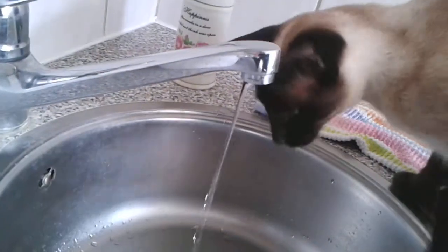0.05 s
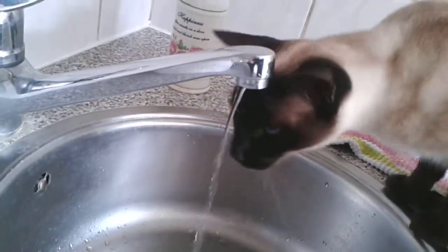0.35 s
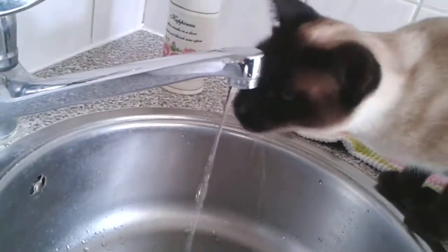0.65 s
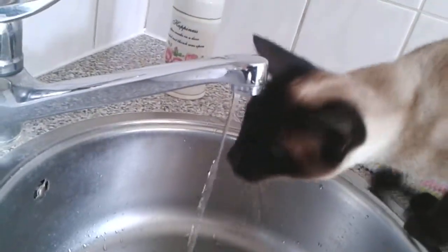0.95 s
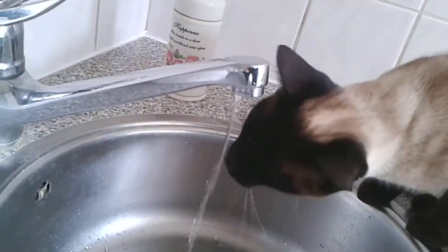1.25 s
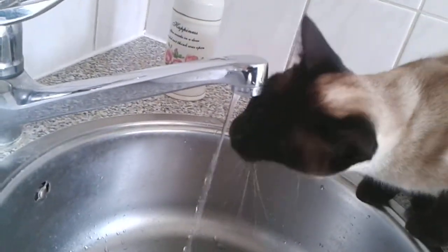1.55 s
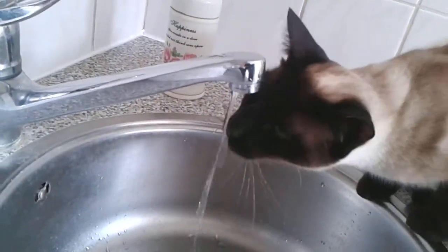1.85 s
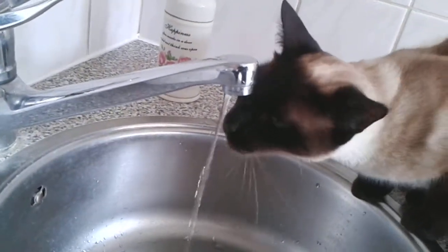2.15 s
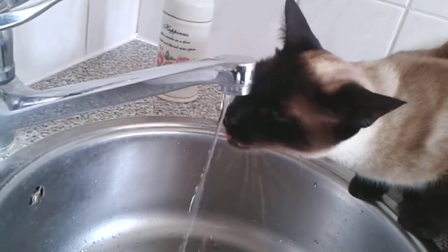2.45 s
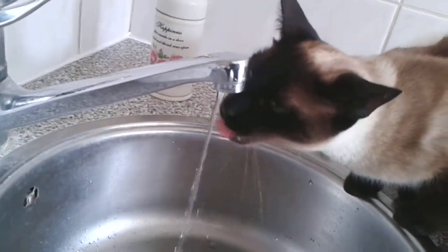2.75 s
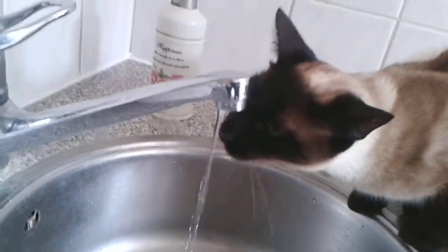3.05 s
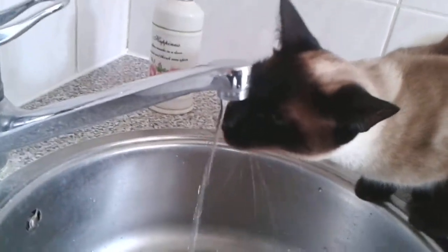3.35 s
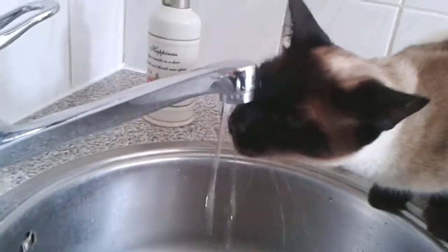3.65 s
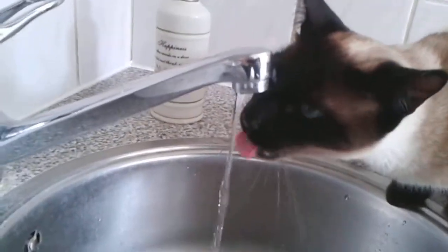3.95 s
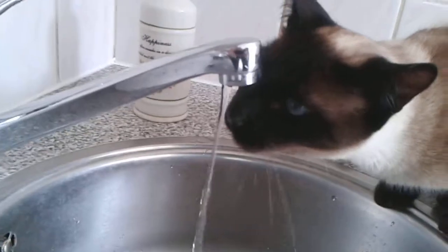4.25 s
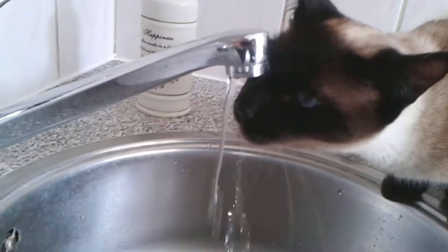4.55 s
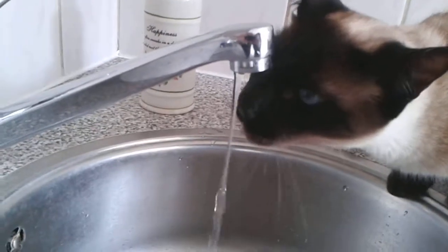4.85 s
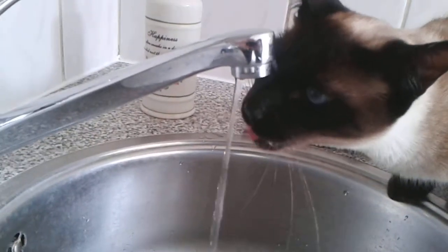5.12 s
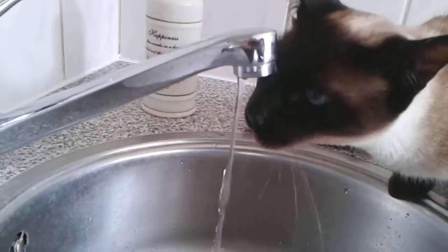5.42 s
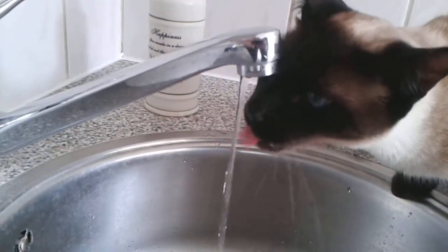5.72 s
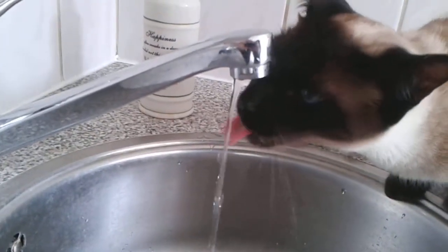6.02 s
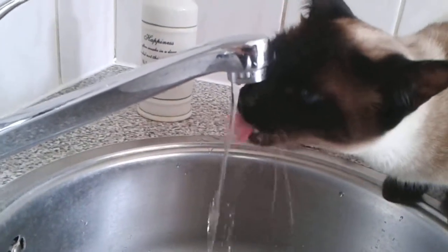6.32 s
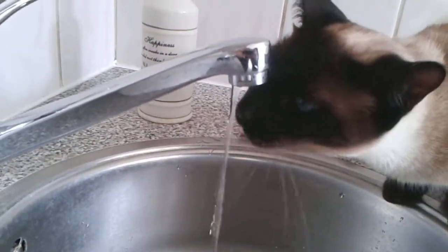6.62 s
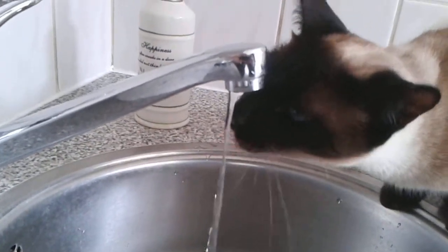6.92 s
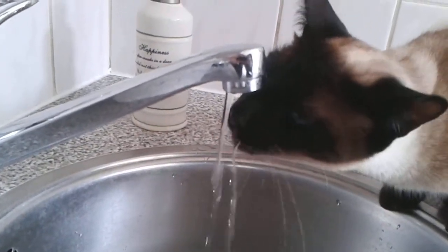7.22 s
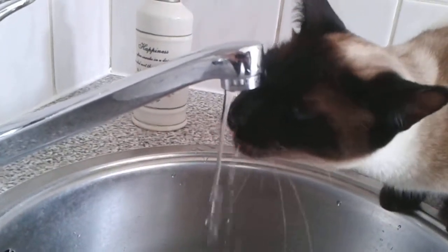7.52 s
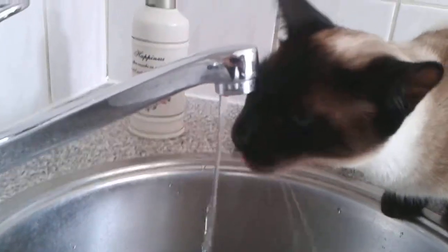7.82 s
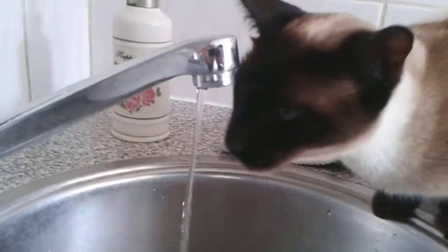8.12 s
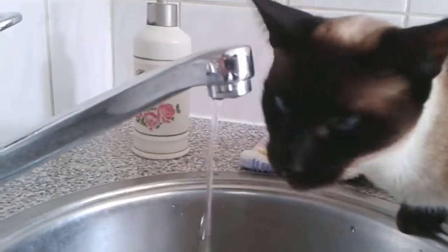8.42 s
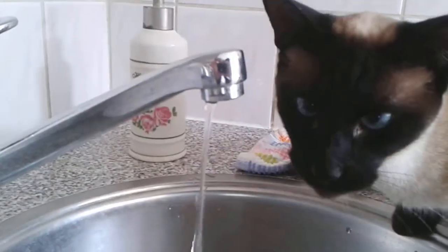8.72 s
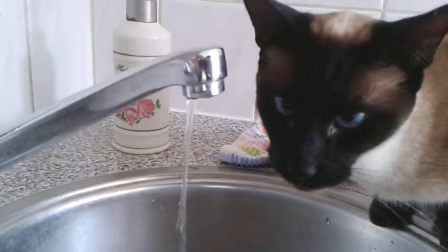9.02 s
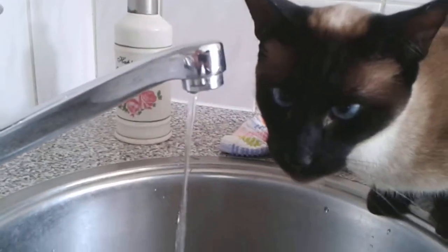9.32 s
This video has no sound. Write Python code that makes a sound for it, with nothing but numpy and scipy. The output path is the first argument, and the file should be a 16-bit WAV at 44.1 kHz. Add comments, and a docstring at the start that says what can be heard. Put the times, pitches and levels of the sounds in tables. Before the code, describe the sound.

A thin stream of tap water falls into a steel sink for the whole nine seconds or so, quiet and close. It fizzes and patters, with tiny high bubble pops, sharp drips on wet metal and a light, low drumming from the basin. The trickle starts gently and dips briefly around 1.5 and 2.5 seconds. From about 3 to 7.5 seconds a cat laps at it, about four soft, hollow clicks a second, each flicking a little water aside. The splatter grows busier, with brighter pops near 3.3, 4.8 and 5.3 seconds. The stream falters for an instant near 3.7 and 7.5 seconds, and the basin gives a faint low note as water lands again. After the lapping stops, the water keeps splashing, with lively drips and pops from 8 seconds to the end. The room is small and tiled, with a faint low rumble and hum underneath.

```python
"""Cat lapping at a kitchen tap

A thin stream falls into a steel sink while a cat laps at it for a spell, about four licks a second.
One flow curve sets how hard the water fizzes, patters and drums; all three sink when the stream breaks.
Bubbles pop and throw fine spray, loose drops tick on wet metal, and each lick flicks water aside.
The splashes rattle round the bowl and fade in a small tiled room, over the low rumble of the house."""
import sys
import numpy as np
from scipy import signal
from scipy.fft import rfft, irfft, next_fast_len
from scipy.io import wavfile
from scipy.ndimage import uniform_filter1d

SR = 44100
rng = np.random.default_rng(int(sys.argv[2]) if len(sys.argv) > 2 else 0)


def bounce(signal):
    """Save signal as a 16-bit WAV file at the path given by the first command-line argument."""
    frames = np.transpose(np.atleast_2d(signal))
    limited = np.clip(frames, -1, 1)
    pcm = np.round(limited * 32767).astype(np.int16)
    wavfile.write(sys.argv[1], SR, pcm)


N = 413216
TIME = np.arange(N) / SR
PATTER_DB = -66.5  # the patter at a flow of 0 dB; stray splashes are set against it

# the larger bubbles that pop where the water lands: t/s, level/dB, f/Hz
POPS = [(0.226, -58, 5550), (0.275, -61, 4600), (0.526, -56, 5470), (0.5944, -42.5, 5840),
        (1.286, -46.5, 4550), (1.324, -54, 4400), (1.353, -57, 4300), (1.4, -59.5, 4400),
        (1.671, -58.5, 4700), (1.711, -46.5, 6530), (1.715, -59, 3370), (1.7583, -44.5, 5600),
        (1.765, -63, 3000), (2.5687, -44.5, 5560), (2.6017, -45, 5570), (2.853, -65, 6600),
        (2.86, -57, 5210), (3.0653, -50.5, 5120), (3.347, -30.5, 5500), (3.4303, -40.5, 6500),
        (3.4485, -48, 6350), (3.484, -52.5, 3170), (3.516, -41, 5220), (3.5157, -53, 2120),
        (3.5437, -42, 5200), (3.819, -44.5, 5600), (3.8917, -39.5, 6600), (3.947, -49, 5130),
        (4.0447, -46.5, 4770), (4.085, -52, 4140), (4.1038, -52.5, 4830), (4.1677, -45.5, 4950),
        (4.2044, -41.5, 6600), (4.329, -46, 4540), (4.3332, -41.5, 6500), (4.342, -38.5, 6430),
        (4.409, -35, 5270), (4.45, -54.5, 4000), (4.452, -53, 5200), (4.701, -41, 5180), (4.735, -43, 3690),
        (4.791, -51, 4070), (4.8264, -24, 5780), (4.845, -53, 5330), (4.915, -51, 5350),
        (4.8683, -36.5, 4240), (4.8693, -44, 2830), (4.9366, -40.5, 6000), (5.099, -64, 2500),
        (5.129, -66, 2370), (5.33, -49.5, 2300), (5.338, -32.5, 5470), (5.3486, -37, 4440),
        (5.452, -61.5, 2080), (5.722, -51.5, 6150), (6.0736, -46.5, 5100), (6.088, -45, 5900),
        (6.228, -40, 5820), (6.365, -54, 5210), (6.519, -58, 6400), (6.853, -47, 6600),
        (7.0028, -42.5, 6900), (7.1568, -45, 5170), (7.193, -52.5, 5700), (7.196, -51.5, 2620),
        (7.271, -46.5, 6030), (7.377, -52, 6400), (7.414, -44, 6340), (7.4443, -47.5, 4450),
        (7.583, -59, 6440), (7.7426, -31.5, 5800), (7.775, -42, 5650), (7.8114, -48.5, 3100),
        (7.827, -34.5, 5600), (7.927, -49.5, 4350), (8.042, -47.5, 5460), (8.1093, -49, 5000),
        (8.211, -44.5, 4380), (8.2095, -49, 2130), (8.2601, -32, 5750), (8.338, -50, 5570),
        (8.3487, -42.5, 5130), (8.424, -54, 3270), (8.677, -51, 4220), (8.739, -50.5, 4600),
        (8.827, -47, 5560), (8.896, -54, 5500), (8.968, -43, 4600), (9.002, -41.5, 5030),
        (9.038, -27, 5660), (9.077, -43, 4720), (9.257, -41.5, 6500), (9.3, -49, 5200)]
# licks of the tongue: t/s, relative level/dB
LICKS = [(3.0866, -52.5), (3.329, -53.5), (3.6058, -56), (4.0615, -57.5), (4.2873, -49.5), (4.5488, -51.5),
         (4.7839, -50), (5.0475, -59.5), (5.293, -55), (5.6508, -63.5), (5.9321, -58.5), (6.1952, -52),
         (6.4314, -51.5), (6.6669, -52), (6.9186, -57), (7.2092, -55.5), (7.4545, -56)]


def undb(db):
    """Decibels to gain."""
    return 10 ** (np.asarray(db) / 20)


def unit(x):
    """Scale to rms 1."""
    return x / np.sqrt(np.mean(x ** 2) + 1e-30)


def set_attack(sound, db):
    """Scale a sound so that its first 8 ms have this rms level."""
    return sound * undb(db) / np.sqrt(np.mean(sound[:353] ** 2))


def add(track, s, sound):
    """Mix a sound into a track from s seconds on."""
    i = int(np.clip(s * SR, 0, N - 1))
    track[i:i + len(sound)] += sound[:N - i]


def fade(t, t60):
    """Exponential decay that loses 60 dB in t60 seconds."""
    return np.exp(-np.log(1000) * t / t60)


def swells(events):
    """A smooth bell-shaped envelope round each (t/s, half length/s, level/dB) event."""
    return sum(undb(db) * np.exp(-((TIME - s) / half) ** 2) for s, half, db in events)


def bursts(events, rise_s, fall_s):
    """A quick rise to each (t/s, level/dB) event and a slower fall; overlaps add in power."""
    t = TIME[::100]
    s, db = np.transpose(events)[:, :, None]
    shapes = undb(db) * np.exp(-np.where(t < s, (s - t) / rise_s, (t - s) / fall_s))
    return np.interp(TIME, t, np.sqrt(np.sum(shapes ** 2, axis=0)))


def wander(rate):
    """A smooth random drift of rms 1, with rate new values a second."""
    hold = int(SR / rate)
    steps = np.repeat(rng.standard_normal(N // hold + 1), hold)
    return unit(uniform_filter1d(uniform_filter1d(steps, hold), hold)[:N])


def colour(x, curve):
    """Equalise by a curve of (f/Hz, gain/dB) points."""
    hz, db = np.transpose(curve)
    size = next_fast_len(len(x) + 512, True)
    f = np.maximum(np.arange(size // 2 + 1) * SR / size, 1)
    gain = undb(np.interp(np.log(f), np.log(hz), db))
    return irfft(rfft(x, size) * gain, size)[:len(x)]


def tint(x, spread_db=3.5):
    """Every spot of the bowl favours other pitches: a random gain each third of an octave."""
    hz = np.geomspace(1000, 16000, 13)
    return colour(x, np.column_stack([hz, spread_db * rng.standard_normal(len(hz))]))


def ring(modes, t, detune):
    """Damped sines from (f/Hz, level/dB, t60/s) modes, each with its own detune ratio."""
    return sum(undb(db) * fade(t, t60) * np.sin(2 * np.pi * hz * ratio * t)
               for (hz, db, t60), ratio in zip(modes, detune))


def bowl(scatter, t60, wet_db, room_t60=0.22):
    """One spot's impulse response: direct sound, quick echoes off the steel, the tiled room's tail."""
    t = TIME[:SR // 6]
    steel, room = rng.standard_normal((2, len(t)))
    steel = steel * fade(t, t60) * (t > .0006)
    room = room * fade(t, room_t60) * np.minimum(t / 0.00092, 1)
    early = (t == 0) + scatter * steel / np.linalg.norm(steel)
    return early / np.linalg.norm(early) + undb(wet_db) * room / np.linalg.norm(room)


def in_bowl(sound, t60, wet_db, scatter=1):
    """Let a sound rattle round the bowl from a new spot."""
    return signal.fftconvolve(sound, bowl(scatter, t60, wet_db))


def bubble(hz, cycles):
    """A pocket of air rings up to its peak in so many cycles and dies, rising a little in pitch."""
    age = np.arange(int(6 * cycles * SR / hz)) * hz / SR / cycles  # 1 at the peak
    envelope = age ** 4 * np.exp(4 * (1 - age))
    return envelope * np.sin(2 * np.pi * cycles * (age + 0.0042 * age ** 2))


def impacts(rate, spread_db):
    """Impulses at random moments, rate a second, most small and a few large."""
    hits, count = np.zeros(N), int(rate * N / SR)
    when, force, side = rng.random((count, 3)).T
    size = undb(spread_db * np.minimum(-np.log(1 - force), 4))
    hits[(when * N).astype(int)] = size * np.sign(side - .5)
    return hits


def spatter(curve, rate, spread_db, spots=6):
    """Tiny impacts at several spots of the bowl; each spot has its own echoes and comes and goes."""
    out = np.zeros(N)
    for _ in range(spots):
        hits = impacts(rate / spots, spread_db) * undb(4 * wander(14))
        echoes = tint(bowl(scatter=1.4, t60=0.018, wet_db=-12.5))
        out += signal.oaconvolve(hits, echoes)[:N]
    return unit(colour(out, curve))


def flow_db(t):
    """How hard the stream lands at times t: gentle until the cat's tongue disturbs it."""
    # strength of the stream: t/s, flow/dB
    flow = [(0, -3.5), (0.7, -5), (1.1, -10.5), (1.75, -4), (2.0, -7.5), (2.65, 2), (3.0, -3), (3.5, 0.5),
            (4.5, -1), (4.8, 4.5), (5.15, -2.5), (5.9, 1.5), (6.5, -3), (7.3, 2), (7.85, 2), (8.4, 1),
            (8.75, 1.5), (9.37, -0.5)]
    return np.interp(t, *np.transpose(flow))


def broken_db(t):
    """How far the water's sound sinks at times t while the stream is broken."""
    # moments when little water lands: t/s, half length/s, depth/dB
    breaks = [(0.037, 0.12, -5), (1.52, 0.019, -11), (2.485, 0.059, -15), (3.257, 0.033, -3.5),
              (3.684, 0.055, -16), (4.63, 0.059, -4.5), (5.518, 0.034, -5), (7.137, 0.0086, -12),
              (7.323, 0.033, -10), (7.577, 0.041, -11.5), (9.205, 0.022, -5.5)]
    return sum(db * np.exp(-((t - s) / half) ** 2) for s, half, db in breaks)


def strays(count, offset_db, spread_db):
    """Chance splashes whose level follows the stream: rows of t/s, level/dB, smallness (0-1)."""
    when, force, smallness = rng.random((count, 3)).T
    s = when * N / SR
    db = PATTER_DB + flow_db(s) + broken_db(s) + offset_db + spread_db * force ** 2
    return np.column_stack([s, db, smallness])


def rumble(drone_db=-62.5, hum_db=-66.5, hum_hz=108.8, waver=.13):
    """The low drone, wavering hum and faint hiss of the house."""
    # room tone: f/Hz, gain/dB
    drone_eq = [(20, -28), (45, -20), (70, -9.5), (100, -4.5), (130, -3), (180, -9), (330, -13.5),
                (550, -19), (800, -25.5), (1300, -28.5), (2600, -32.5), (5300, -34), (8000, -35.5),
                (16000, -35)]
    pitch = hum_hz * (1 + waver * wander(40))
    hum = np.sin(2 * np.pi * np.cumsum(pitch) / SR)
    drone = colour(rng.standard_normal(N), drone_eq)
    return undb(drone_db) * unit(drone) + undb(hum_db) * unit(hum)


def click(at_s=8.2785, peak_db=-34):
    """One tiny dry click close by."""
    out = np.zeros(N)
    add(out, at_s, undb(peak_db) * fade(TIME[:SR // 100], t60=0.00027))
    return out


def hisses():
    """Soft brief hisses: the cat sniffing, water running smoothly, or the tail of the loudest pop."""
    # swells of hiss: t/s, half length/s, level/dB
    spells = [(0.327, 0.08, -87), (0.753, 0.033, -60.5), (1.332, 0.064, -61.5), (1.75, 0.13, -65.5),
              (2.22, 0.18, -63.5), (2.771, 0.029, -59), (3.768, 0.067, -62.5), (4.89, 0.085, -60),
              (5.75, 0.029, -57.5), (6.757, 0.037, -60.5), (8.015, 0.29, -64.5)]
    # a soft, broad hiss: f/Hz, gain/dB
    hiss_eq = [(1000, 4.5), (2000, -1), (2800, 10.5), (3600, 9), (4400, 11.5), (5400, 12), (6500, 6),
               (7600, 0), (16000, -31)]
    return swells(spells) * unit(colour(rng.standard_normal(N), hiss_eq))


def sizzle():
    """Dense droplets on steel: two hissing tails that linger after loud pops, then two longer swells."""
    # swells of sizzle: t/s, half length/s, level/dB
    spells = [(4.89, 0.044, -62), (5.375, 0.035, -63), (8.02, 0.3, -63), (9.08, 0.098, -65)]
    # a narrow, bright sizzle: f/Hz, gain/dB
    sizzle_eq = [(2000, -24), (3700, -16), (4250, 2), (4900, 6), (5500, 17), (6200, -7), (7400, -19),
                 (16000, -43)]
    return swells(spells) * spatter(sizzle_eq, rate=2500, spread_db=3, spots=3)


def drumming():
    """The stream patters on the sink floor and rings its low modes."""
    # modes of the steel floor: f/Hz, relative level/dB, t60/s
    modes = [(144, 3, 0.095), (257, -1.5, 0.051), (306.5, -2, 0.083), (350.7, 0, 0.064), (424, 0.5, 0.038),
             (492.6, -3, 0.083), (561.6, -3.5, 0.12), (640, -3, 0.042), (820, -2.5, 0.016)]
    floor = ring(modes, TIME[:SR // 3], detune=np.ones(len(modes)))
    drum = signal.oaconvolve(impacts(rate=320, spread_db=3), floor)[:N]
    return unit(colour(drum, [(60, -15.5), (200, -0.5), (750, -2.5), (1300, -5.5), (4000, -38)]))


def basin():
    """The basin murmurs as the stream drums harder for a moment."""
    # spells of harder drumming: t/s, half length/s, level/dB
    spells = [(0.255, 0.047, -63), (0.4, 0.027, -63), (0.57, 0.04, -62), (0.68, 0.03, -61),
              (1.11, 0.055, -64.5), (1.35, 0.043, -69), (1.66, 0.043, -74), (2.27, 0.05, -68)]
    # the basin's hollow midrange: f/Hz, gain/dB
    murmur_eq = [(200, -24), (400, -8), (620, -3), (800, -5), (1300, -14)]
    return swells(spells) * unit(colour(drumming(), murmur_eq))


def booms():
    """Gathered water lands at once: the thin floor swells into one low note and dies away."""
    # notes of the floor: t/s, rise/s, peak level/dB, f/Hz
    notes = [(2.598, 0.014, -58, 310), (3.724, 0.037, -55, 303.4), (5.158, 0.062, -56, 292.7),
             (7.631, 0.027, -56.5, 244)]
    out, t = np.zeros(N), TIME[:SR // 3]
    for s, rise, db, hz in notes:
        envelope = (t / rise * np.exp(1 - t / rise)) ** 2
        add(out, s, undb(db) * envelope * np.sin(2 * np.pi * hz * t))
    return out


def crackle(centre_hz=5200, range_octaves=.8):
    """Many tiny bubbles: most burst too fast to ring, a few give a faint pitch."""
    out = np.zeros(N)
    for s, db, smallness in strays(count=340, offset_db=-1.5, spread_db=7):
        hz = centre_hz * 2 ** (range_octaves * (smallness - .5))
        pip = bubble(hz, cycles=.8 + 4 * rng.random() ** 2)
        add(out, s, set_attack(in_bowl(pip, t60=0.029, wet_db=-13), db))
    return out


def dribble(lowest_hz=1500, range_octaves=1.2):
    """Thrown water spatters back in small dull ticks at random moments."""
    out = np.zeros(N)
    for s, db, smallness in strays(count=150, offset_db=-1, spread_db=8):
        hz = lowest_hz * 2 ** (range_octaves * smallness)
        tick = bubble(hz, cycles=.6 + 2.5 * rng.random() ** 2)
        add(out, s, set_attack(in_bowl(tick, t60=0.029, wet_db=-13.5), db))
    return out


def squelches(bubbles_per_s=340, pitch_spread=.56):
    """A film of water breaks into a quick run of bubbles whose pitch slides."""
    # runs of bubbles: t/s, length/s, level/dB, first f/Hz, last f/Hz
    runs = [(0.584, 0.031, -49.5, 6800, 6840), (1.72, 0.057, -65.5, 3600, 3140),
            (3.431, 0.054, -64, 3020, 3360), (3.758, 0.071, -57.5, 2550, 1880),
            (3.879, 0.065, -65.5, 2660, 3600), (4.236, 0.015, -58, 2820, 3800),
            (4.308, 0.025, -58, 3830, 2300), (4.409, 0.015, -47, 3280, 3940),
            (5.765, 0.047, -58.5, 2300, 2360), (5.845, 0.023, -50.5, 2290, 1980),
            (5.945, 0.019, -60, 3250, 2820), (6.697, 0.014, -55.5, 2300, 2490),
            (7.263, 0.017, -58, 3100, 2760), (8.034, 0.017, -51.5, 2560, 2070),
            (8.419, 0.025, -54, 2200, 2440), (8.424, 0.018, -49.5, 5900, 5370),
            (8.732, 0.029, -56.5, 2320, 2390), (9.075, 0.033, -54, 2650, 2200)]
    out = np.zeros(N)
    for s, length, db, first_hz, last_hz in runs:
        run = np.zeros(SR // 4)
        count = int(np.clip(length * bubbles_per_s, 3, 60))
        for k, (late, pitch, size, purity) in enumerate(rng.random((60, 4))[:count]):
            progress = (k + late) / count
            slide_hz = first_hz + progress * (last_hz - first_hz)
            hz = slide_hz * np.exp(pitch_spread * (pitch - .5))
            cycles = .9 + 3 * purity ** 2
            add(run, progress * length, undb(7 * size) * bubble(hz, cycles) / np.sqrt(cycles))
        run = in_bowl(run, t60=0.018, wet_db=-10)
        rms = np.sqrt(np.sum(run ** 2) / (length * SR))
        add(out, s, run * undb(db) / rms)
    return out


def drops(gain_db=1.5, body_db=-3):
    """Loose drops slap the wet steel: broad ticks, brighter for smaller drops."""
    # the larger drops: t/s, relative level/dB, treble tilt/dB
    large = [(0.2337, -52.5, 13), (0.5592, -45.5, 1), (0.8296, -48.5, 9), (0.8604, -48.5, -1),
             (1.259, -58.5, -1), (1.32, -52, 8), (1.595, -57, 6), (1.6135, -53.5, 7), (1.81, -56, 8),
             (1.8405, -44.5, 9), (2.2205, -48.5, 1), (2.299, -47, -10), (2.568, -53.5, -1),
             (3.032, -55, 11), (3.083, -47, 2), (3.143, -59, 6), (3.188, -60, 5), (3.2964, -44, -3),
             (3.3931, -51, 9), (3.4135, -47, 3), (3.8165, -57, 2), (3.8914, -48.5, -12), (4.1942, -60, 27),
             (4.225, -50.5, 13), (4.2814, -53.5, -6), (4.3825, -49, -1), (4.7068, -49, -1),
             (4.9366, -55, 9), (5.2875, -50.5, 6), (5.3462, -50, 0), (5.399, -45, 8), (5.555, -56, -9),
             (5.6095, -56, -24), (5.7391, -50, 44), (5.7629, -55, 18), (5.9904, -48, 11), (6.2285, -48, -1),
             (6.453, -59, -9), (6.602, -56.5, 0), (6.833, -49, -5), (7.004, -48, 6), (7.377, -58, 13),
             (7.7422, -50, 9), (7.7639, -48.5, -31), (7.7764, -39, -28), (7.827, -47.5, 0),
             (7.914, -50, 10), (8.0364, -53.5, 8), (8.1156, -51.5, 23), (8.2, -46.5, 8), (8.228, -51.5, 1),
             (8.245, -51, 2), (8.2592, -45.5, 3), (8.2932, -42.5, -7), (8.378, -63, 6), (8.558, -55, 2),
             (8.592, -41.5, 4), (8.615, -64, 4), (8.6362, -53.5, 2), (8.666, -50.5, -9), (8.7615, -46, -1),
             (8.8268, -51, 9), (9.0011, -49, 19), (9.013, -52, 6), (9.0784, -47.5, 8), (9.224, -54, 12),
             (9.2568, -54, 12)]
    # a slap on wet steel: f/Hz, gain/dB
    slap_eq = [(300, -19), (2000, -17), (4000, -12.5), (5500, 1.5), (8000, -2.5), (11000, -3.5),
               (14000, -9.5), (16000, -15.5)]
    faint = [(s, db, 24 * smallness - 6)
             for s, db, smallness in strays(count=150, offset_db=-5, spread_db=11)]
    out, lead = np.zeros(N), 32  # samples of room for the filters to ring ahead of the hit
    for s, db, bright_db in list(large) + faint:
        slap = np.pad(bowl(scatter=1.9, t60=0.031, wet_db=-9), (lead, 0))
        tilt = [(4000, -bright_db / 2 + body_db), (8500, -bright_db / 2), (13000, bright_db / 2)]
        tick = tint(colour(colour(slap, slap_eq), tilt))
        add(out, s - lead / SR, set_attack(tick, db + gain_db))
    return out


def pops():
    """Single bubbles rattle round the bowl; hard splashes burst quickly, gentle ones ring longer."""
    out = np.zeros(N)
    for s, db, hz in POPS:
        pop = bubble(hz, cycles=np.interp(db, [-52, -32], [4.2, 3.0]))
        pop[0] += 0.15  # the snap of the surface closing
        add(out, s, set_attack(in_bowl(pop, t60=0.034, wet_db=-12), db))
    return out


def stream(fizz_db=-70.5, drum_db=-62.5, spray_db=-60, flick_db=-62.5):
    """Running water: fine fizz, duller patter and the drumming floor, all sinking when it breaks."""
    # the fine fizz: f/Hz, gain/dB
    fizz_eq = [(1500, -14), (3400, -8), (4400, 2), (5300, 3.5), (6700, -6), (7500, -13.5), (10000, -10.5),
               (16000, -20)]
    # the duller patter: f/Hz, gain/dB
    patter_eq = [(400, -1), (800, -0.5), (1000, 1.5), (1150, 0), (1400, 2), (1600, -1.5), (1850, 2),
                 (2200, 2.5), (2400, -8.5), (2700, 2), (3500, -9), (5000, -1), (9000, -14.5)]
    # each pop throws spray (spray_db for a pop of -49 dB); each lick flicks water aside
    spray = bursts([(s, spray_db + .45 * (db + 49)) for s, db, _ in POPS], rise_s=0.002, fall_s=0.032)
    flick = bursts([(s, flick_db) for s, _ in LICKS], rise_s=0.0034, fall_s=0.12)
    flow = flow_db(TIME)  # each layer follows the flow at its own slope
    fizz_gain = np.hypot(undb(fizz_db + 0.5 * flow), spray)
    patter_gain = np.hypot(undb(PATTER_DB + 1.35 * flow), flick)
    fizz = fizz_gain * spatter(fizz_eq, rate=900, spread_db=6.5)
    patter = patter_gain * spatter(patter_eq, rate=900, spread_db=4)
    drum = undb(drum_db + 0.63 * flow) * drumming()
    return undb(broken_db(TIME)) * (fizz + patter + drum)


def licks(gain_db=-1, detune_spread=0.026):
    """Each lick is a hollow tock; the mouth is never shaped quite the same."""
    # resonances of the mouth: f/Hz, relative level/dB, t60/s
    mouth = [(751, 14.5, 0.023), (780, -16, 0.012), (1361, 7, 0.036), (1390, -31, 0.029),
             (1902, -1.5, 0.029), (2200, -9.5, 0.033)]
    out = np.zeros(N)
    for s, db in LICKS:
        detune = 1 + detune_spread * rng.standard_normal(len(mouth))
        tock = in_bowl(ring(mouth, TIME[:SR // 10], detune), t60=0.025, wet_db=-9, scatter=.65)
        add(out, s, set_attack(tock, db + gain_db))
    return colour(out, [(200, -15), (600, 2), (2400, 13.0), (3500, -10), (8000, -22)])


def scene():
    """Water and cat at the sink, over the rumble of the house, in mono."""
    splashes = pops() + drops() + crackle() + dribble() + squelches()
    bed = stream() + hisses() + sizzle() + basin() + booms()
    return (splashes + bed + licks() + click() + rumble())[None]


def record(dry):
    """A steep low-pass cuts the top above 16.2 kHz."""
    return signal.sosfilt(signal.ellip(10, .2, 70, 16200, fs=SR, output="sos"), dry)


dry = scene()
out = record(dry)
bounce(out)
```